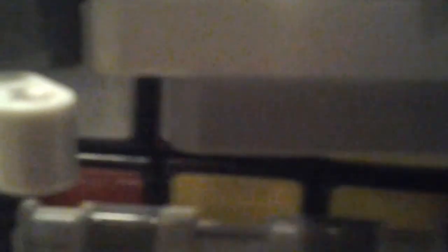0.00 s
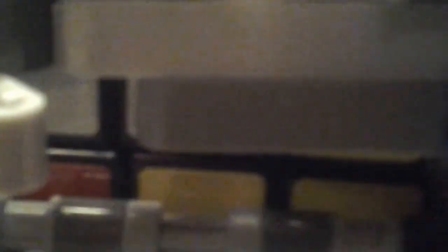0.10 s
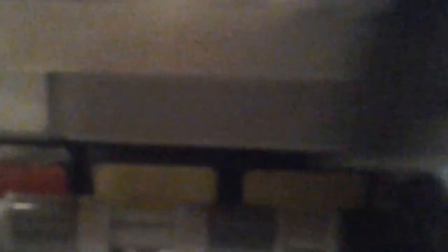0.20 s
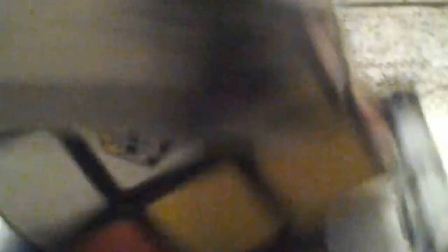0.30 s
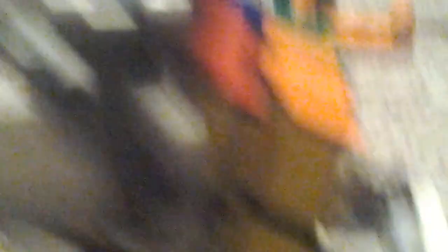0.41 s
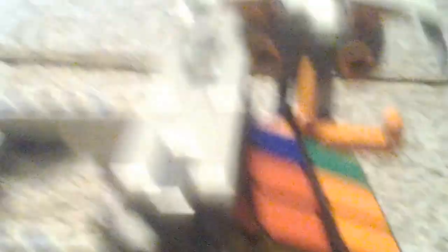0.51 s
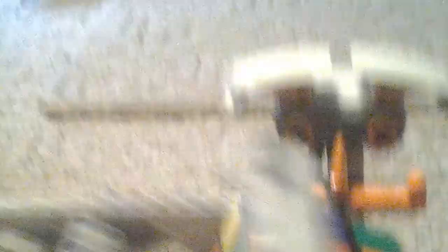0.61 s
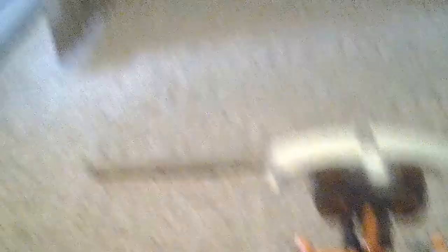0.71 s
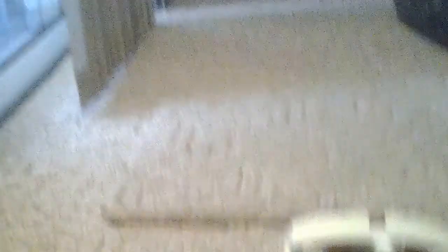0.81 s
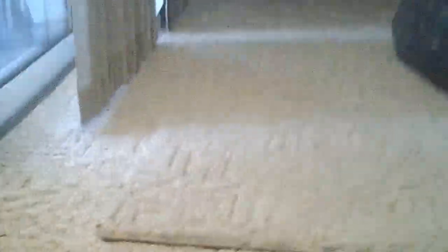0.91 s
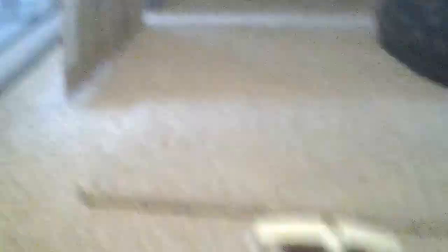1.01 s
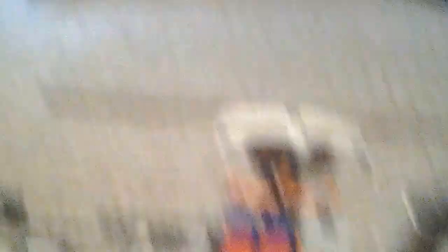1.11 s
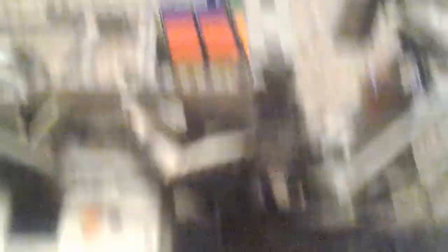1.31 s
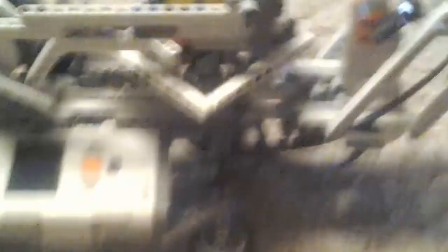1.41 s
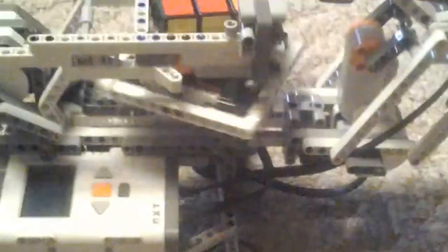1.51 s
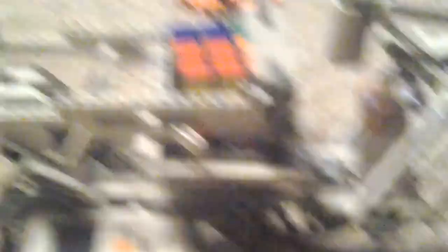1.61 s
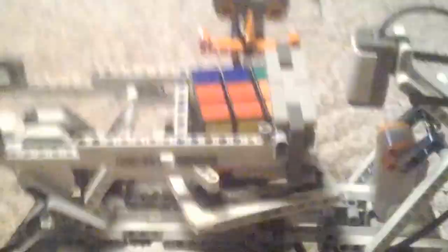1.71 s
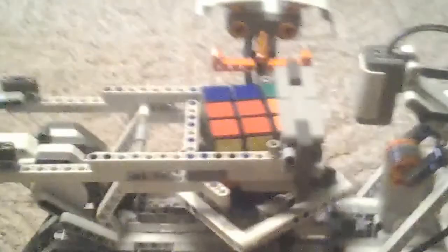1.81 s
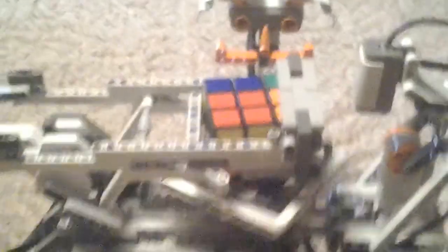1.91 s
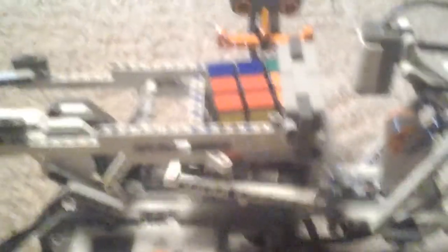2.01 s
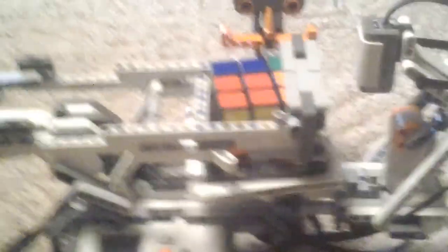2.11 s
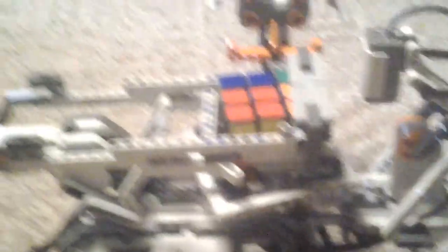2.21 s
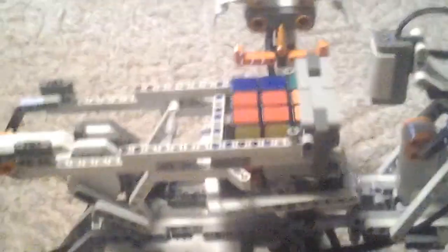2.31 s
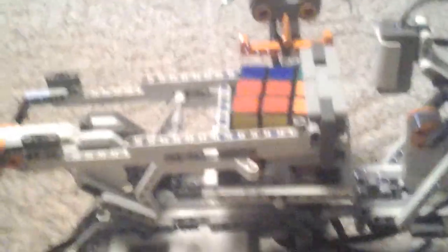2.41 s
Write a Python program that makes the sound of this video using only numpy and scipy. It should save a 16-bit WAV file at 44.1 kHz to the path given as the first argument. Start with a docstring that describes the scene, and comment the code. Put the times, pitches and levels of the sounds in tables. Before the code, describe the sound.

Geared toy motor whirring: quick rising zip, hard plastic clatter, labouring grind, then a longer rattling run

```python
"""On a carpeted floor, a toy robot turns a puzzle cube close to a small microphone.
Geared motors make a quick rising whirr, a labouring run under load and a long rattling run that coasts out.
Gear teeth are stacks of harmonics for the whine, and uneven pulses plus scraping noise for the rattle.
Plastic clicks, soft frame bumps and gear knocks are short bursts of noise that ring.
A thin motor whistle and short room echoes join in, and the loudest peaks overload."""
import sys
import numpy as np
from scipy import signal
from scipy.fft import rfft, irfft
from scipy.io import wavfile
from scipy.ndimage import uniform_filter1d

SR = 44100
rng = np.random.default_rng(int(sys.argv[2]) if len(sys.argv) > 2 else 0)


def pcm_store(signal):
    """Save signal as 16-bit PCM."""
    levels = np.round(np.clip(np.atleast_2d(signal), -1, 1) * 32767)
    wavfile.write(sys.argv[1], SR, levels.astype(np.int16).T)


N = 108045  # length in samples
T = np.arange(N) / SR  # time in seconds


def undb(db):
    """Turn decibels into gain."""
    return 10 ** (np.asarray(db) / 20)


def unit(x):
    """Scale to an average (rms) level of 1."""
    return x / np.sqrt(np.mean(x ** 2))


def peak(x, db):
    """Scale so that the highest peak has this level."""
    return x / np.abs(x).max() * undb(db)


def curve(table, axis=1):
    """Join one column of a table by straight lines in time."""
    rows = np.array(table)
    return np.interp(T, rows[:, 0], rows[:, axis])


def envelope(table, axis=1):
    """Turn a level_db column into gain, fading quickly outside the table's times."""
    before = np.maximum(table[0][0] - T, 0)
    after = np.maximum(T - table[-1][0], 0)
    return undb(curve(table, axis=axis)) * np.exp(-(before + after) / 0.0048)


def walk(rate_hz):
    """Random motion with spread 1; a higher rate moves faster."""
    freqs = np.arange(N // 2 + 1) * SR / N
    smoothing = (freqs > 0) / (1 + (freqs / rate_hz) ** 4)
    return unit(irfft(rfft(rng.standard_normal(N)) * smoothing, N))


def colour(x, points):
    """Filter through (pitch_hz, level_db) points, as a body rings after a blow and never before it."""
    hz, db = np.array(points).T
    octaves = np.log2(np.maximum(np.arange(N + 1) * SR / (2 * N), 1))
    below = np.maximum(np.log2(hz[0]) - octaves, 0)
    above = np.maximum(octaves - np.log2(hz[-1]), 0)
    # past the end points the level falls 29 dB per octave, for two octaves at most
    level_db = np.interp(octaves, np.log2(hz), db) - 29 * np.minimum(below + above, 2)
    # folding the cepstrum (spectrum of the log spectrum) makes the filter minimum-phase
    cepstrum = irfft(np.log(undb(level_db)))
    cepstrum[1:N] *= 2
    cepstrum[N + 1:] = 0
    return irfft(rfft(x, 2 * N) * np.exp(rfft(cepstrum)))[:N]


def ring(x, hz, width_hz):
    """Ring at one pitch; a narrower resonance rings longer."""
    b, a = signal.iirpeak(hz, hz / width_hz, fs=SR)
    return signal.lfilter(b, a, x)


def contact(start_s, decay_s):
    """A blow that starts suddenly, as noise that dies away quickly."""
    age = np.maximum(T - start_s, 0)
    return rng.standard_normal(N) * (T >= start_s) * np.exp(-age / decay_s)


def catching(rate_hz, depth_db):
    """Gears catch and slip unevenly: the level jumps up, then fades (a negative depth swells, then drops)."""
    phase = np.cumsum(rate_hz * np.exp(.4 * walk(59.8))) / SR
    return uniform_filter1d(undb(-depth_db * (phase % 1)), size=12)


def whine(hz, teeth_db, jitter, flutter_db, grit):
    """Meshing teeth make a stack of harmonics: the speed jitters, each harmonic flutters and frays."""
    phase = 2 * np.pi * np.cumsum(hz * (1 + jitter * walk(67.5))) / SR
    tone = 0
    for order, db in enumerate(teeth_db, start=1):
        gain = undb(db + flutter_db * walk(74))
        fray = grit * walk(264)
        tone = tone + gain * np.cos(order * phase + fray + 2 * np.pi * rng.random())
    return unit(tone)


def rattle(hz, body, scatter_db, scrape, surge_db, catch_hz, catch_db):
    """Teeth knock unevenly and scrape as they slide; both ring the plastic body."""
    phase = np.cumsum(hz * (1 + .1 * walk(300))) / SR
    strength = undb(scatter_db * np.clip(rng.standard_normal(N), -2, 2))
    teeth = np.diff(np.floor(phase), prepend=0) * strength * rng.choice([-1, 1], N)
    sliding = rng.standard_normal(N) * np.exp(-2 * (phase % 1))
    rough = unit(teeth) + scrape * unit(sliding)
    sound = colour(rough * undb(surge_db * walk(33)) * catching(catch_hz, catch_db), body)
    # even out the slow changes in level, so that each run's own curve sets them
    return sound / np.sqrt(uniform_filter1d(sound ** 2, size=1800))


# Loose parts shifting, mostly between the runs: start_s, level_db
SHIFTING_LEVEL = [(0,-38.5),(.11,-47.5),(.18,-40.5),(.3,-80),(.39,-41),(.413,-25.5),(.435,-33),(.46,-38.5),(.5,-33),(.535,-47),(.56,-43.5),(.9,-37),(.93,-40),(.98,-30),(1.015,-40),(1.06,-41.5),(1.13,-38),(1.2,-38.5),(2.15,-67),(2.22,-37.5),(2.45,-45.5)]
# How the loose parts ring: pitch_hz, level_db
LOOSE_PARTS_BODY = [(35, -70), (60, -34), (367, -10), (769, -15.5), (957, -13.5), (1450, -10.5),
                    (2010, -10), (2240, -11.5), (2780, -8), (3860, -5.5), (4210, -2.5), (5360, -7),
                    (5840, -11), (7430, -18.5), (11000, -28.5), (14300, -48), (22000, -120)]


def shifting():
    """Slack parts tick and rub: an uneven rattle with a lot of scraping."""
    ticks = rattle(260, LOOSE_PARTS_BODY, scatter_db=4, scrape=2.5, surge_db=1.8, catch_hz=70, catch_db=5)
    return ticks * envelope(SHIFTING_LEVEL)


# Whistle of the motor drive, before its flutter: start_s, level_db
DRIVE_LEVEL = [(0,-59),(.06,-55),(.17,-68),(1.1,-72),(1.27,-42),(1.45,-43),(1.7,-51),(2.15,-53),(2.22,-68)]
DRIVE_HZ = 7864


def drive():
    """The pulsed motor current whistles at one thin, fluttering pitch, strongest early in the long run."""
    return envelope(DRIVE_LEVEL) * undb(2 * walk(30)) * np.sin(2 * np.pi * DRIVE_HZ * T)


# Plastic clicks: start_s, peak_db, pitch_hz, decay_s
CLICK_EVENTS = [(.001,-27,2700,0.0085),(0.0091,-18,3660,0.0037),(0.051,-24,4700,0.0037),(0.0802,-26,4920,0.0067),(0.0902,-28,4540,0.002),(0.1226,-16,5020,0.0029),(0.139,-28,3200,0.0027),(0.1588,-20.5,3800,0.0018),(.174,-38,4770,0.0035),(0.184,-21,4500,0.0023),(0.195,-16,4050,0.0044),
                (.3515,-1.5,4260,0.00088),(0.359,-4,4010,0.011),(.3968,2.5,3150,0.0037),(0.402,-1.5,4640,0.0066),(0.4415,-13,4190,0.01),(0.47,-20.5,2760,0.0068),(0.486,-12.5,2760,0.0062),(0.5113,-13,2870,0.0024),(0.5559,-13.5,4130,0.0036),(0.565,-15.5,4200,0.0077),
                (0.5913,-5,4570,0.003),(0.6066,-8.5,4040,0.0018),(0.616,-4.5,4630,0.0012),(.648,-6,4430,0.0092),(0.631,-3,6300,0.0033),(0.6713,0.5,4100,0.0018),(0.672,-6.5,6500,0.0037),(0.6792,-3,4330,0.0028),(0.696,-4,4700,0.00078),(0.7066,-3,4280,0.0043),(0.7156,-3.5,4140,0.0084),(0.7287,-6,4160,0.0024),(0.7534,-9.5,3000,0.0028),(0.7705,-5.5,4300,0.0047),(0.789,-15,4050,0.0031),(0.8,-13,2670,0.0039),(0.845,-10,4730,0.0034),(0.901,-16,3740,0.0046),
                (0.9364,-28,4380,0.0092),(1.031,-15.5,4680,0.0054),(1.0866,-23,5000,0.0038),(1.373,-8,1500,0.0012),(2.422,-26,4450,.002),(2.4343,-11.5,4460,0.0017),(2.4405,-17.5,4600,.007)]
# How the plastic parts ring: pitch_hz, level_db
PLASTIC_BODY = [(59, -85), (100, -67), (375, -38), (849, -17), (942, -5), (1430, -14), (2090, -3),
                (2270, -5.5), (2800, 7), (3610, -0.5), (4350, 6), (6090, -6), (11000, -20), (15000, -51)]
RING_WIDTH_HZ, RING_DB = 340, 3.5  # each click's own ring; its level is relative to the plastic body


def clicks():
    """Plastic beams and cube faces knock together: a shared body sound plus each click's own short ring."""
    body = colour(signal.unit_impulse(N), PLASTIC_BODY)[:512]
    out = np.zeros(N)
    for start_s, peak_db, pitch_hz, decay_s in CLICK_EVENTS:
        blow = contact(start_s, decay_s)
        plastic = unit(np.convolve(blow, body)[:N])
        own_ring = unit(ring(blow, pitch_hz, RING_WIDTH_HZ))
        out = out + peak(plastic + undb(RING_DB) * own_ring, peak_db)
    return out


# Speed of the quick run, as teeth passing per second: start_s, pitch_hz
QUICK_SPEED = [(.2,450),(.217,499),(.233,557),(.243,595.6),(.26,648.4),(.276,681),(.3,691),(.32,712),(.336,754)]
# Loudness of the quick run: start_s, whine_db, rattle_db
QUICK_LEVELS = [(.19,-56,-28),(.203,-23.5,-15.5),(.231,-14,-11.5),(.258,-10,-15.5),(.287,-11.5,-17),(.329,-11,-16),(.339,-31,-19.5),(.372,-56,-38),(.392,-70,-38)]
# Harmonics of the tooth rate, lowest first: level_db
QUICK_TEETH_DB = [-50,-11,-5,-11.5,-0.5,-6,2.5,-15,-12,-23,-10,-25,-24]
# The casing favours harmonics that sweep through its ring: pitch_hz, level_db
QUICK_CASING = [(1300,-5.5),(2900,-5.5),(3500,4.5),(4550,4),(5100,-9.5),(7500,-3),(11000,-2)]
# How the rattle rings the body: pitch_hz, level_db
QUICK_BODY = [(240, -104), (400, -71), (612, -93), (816, -22), (949, -39), (1350, -16.5), (1690, -24),
              (2000, -13.5), (2510, -10.5), (3340, -10), (4390, 0), (5680, -8.5), (11200, -19),
              (15000, -57)]


def quick_run():
    """A free motor speeds up, so its gritty whine rises and its teeth rattle faster."""
    hz = curve(QUICK_SPEED)
    tone = whine(hz, QUICK_TEETH_DB, jitter=.003, flutter_db=2.2, grit=.25)
    tone = unit(colour(tone, QUICK_CASING))
    gears = rattle(hz, QUICK_BODY, scatter_db=1.5, scrape=1.36, surge_db=0.8, catch_hz=200, catch_db=-1.0)
    return tone * envelope(QUICK_LEVELS) + gears * envelope(QUICK_LEVELS, axis=2)


# Dull bumps of the frame: start_s, peak_db, pitch_hz, decay_s
BUMP_EVENTS = [(0.398,-49,328,0.013),(0.707,-18,1080,0.0037),(0.832,-25.5,276,0.0036),(.848,-36,293.2,0.0053),(0.935,-37.5,270,0.011),(.985,-28,470,0.038),(1.023,-34.5,370,0.0048),(1.488,-19,497,0.0018),(1.49,-34.5,300,0.0064),(1.726,-31,272,0.0036)]


def bumps(width=0.97):
    """The frame knocks softly and low: each blow passes twice through a broad ring."""
    out = np.zeros(N)
    for start_s, peak_db, pitch_hz, decay_s in BUMP_EVENTS:
        once = ring(contact(start_s, decay_s), pitch_hz, width * pitch_hz)
        out = out + peak(ring(once, pitch_hz, width * pitch_hz), peak_db)
    return out


# Speed of the loaded run, as teeth passing per second: start_s, pitch_hz
LOADED_SPEED = [(.56,497.3),(.595,546.7),(.607,584),(.625,631.4),(.65,655.7),(.70,619),(.73,634.4),(.78,615.6),(.83,632.2),(.88,637.3)]
# Loudness of the whine: start_s, level_db
LOADED_WHINE = [(.57,-49),(.598,-22),(.607,-13),(.619,-10.5),(.622,2.5),(.627,-4),(.632,-7),(.652,-22),(.665,-34),(.705,-39),(.727,-2),(.738,-25.5),(.781,-16.5),(.795,-52),(.819,-28),(.825,-16),(.837,-13.5),(.842,-37),(.877,-21.5),(.9,-34)]
# Loudness of the grinding: start_s, level_db
LOADED_RATTLE = [(.553,-43),(.588,-18.5),(.6,-13.5),(.63,-16.5),(.652,-16),(.664,-23),(.678,-14.5),(.698,-25.5),(.711,-16),(.742,-27.5),(.762,-28),(.773,-17.5),(.795,-27),(.818,-30),(.858,-18),(.88,-19),(.892,-35),(.915,-36)]
# Harmonics of the tooth rate, lowest first: level_db
LOADED_TEETH_DB = [-58,-25.5,-33,-10,-17,-2,9,-8,-37,-21,-17]
# How the grinding rings the body: pitch_hz, level_db
LOADED_BODY = [(180, -56), (300, -49), (326, -54), (377, -70), (669, -44), (1040, -28.5), (1400, -31.5),
               (2730, -10.5), (3490, -13.5), (4470, -2.5), (5620, -21), (6510, -18), (7420, -24),
               (11400, -24.5), (12700, -78)]


def loaded_run():
    """The motor labours against the cube; its gears squeal in fits and grind in separate grains."""
    hz = curve(LOADED_SPEED)
    tone = whine(hz, LOADED_TEETH_DB, jitter=.007, flutter_db=4, grit=.25)
    tone = tone * unit(catching(230, depth_db=8))
    grind = rattle(hz, LOADED_BODY, scatter_db=2.5, scrape=.8, surge_db=1, catch_hz=190, catch_db=9)
    return tone * envelope(LOADED_WHINE) + grind * envelope(LOADED_RATTLE)


# Speed (teeth per second, before the wobble) and whine of the long run: start_s, pitch_hz, level_db
LONG_SPEED = [(1.17,718.8,-44),(1.225,756.4,-35),(1.27,786.8,-26),(1.33,783.1,-25),(1.4,789.4,-25),(1.46,783.6,-25),(1.53,783,-31),(1.58,797.7,-27),(1.65,824,-25),(1.75,833.2,-28),(1.81,815.6,-24),(1.85,788,-24),(1.89,772.2,-26.5),(1.94,762.7,-21.5),(1.98,785.6,-31),(2.05,822,-29.5),(2.12,854.2,-27),(2.17,867.2,-30),(2.2,835.5,-44)]
# Loudness before the trims below: start_s, housing_db, gearbox_db
LONG_LEVELS = [(1.135,-51,-34),(1.16,-39.5,-24.5),(1.198,-40.5,-27),(1.22,-34.5,-21),(1.27,-27,-15.5),(1.36,-22.5,-15),(1.48,-24.5,-19.5),(1.545,-27.5,-20.5),(1.6,-21.5,-19.5),(1.655,-26.5,-21),(1.69,-24,-17.5),(1.76,-26,-22),(1.826,-26,-18.5),(1.845,-27,-25),(1.877,-26,-15.5),(1.9,-30,-20.5),(1.95,-27.5,-22),(2.06,-23.5,-20),(2.125,-24.5,-18.5),(2.17,-24,-23.5),(2.21,-46,-36.5),(2.238,-35,-37),(2.295,-30,-31),(2.37,-34.5,-35),(2.395,-44,-49),(2.43,-40,-32.5),(2.45,-54,-43)]
# Harmonics of the tooth rate, lowest first: level_db
LONG_TEETH_DB = [-18,-1.5,0,-7,7,-5,-29,-17.5,-9,-16]
# Harmonics of a slower gear stage, lowest first: level_db
IDLER_TEETH_DB = [-26,-24,-26,0]
# How the housing rings: pitch_hz, level_db
HOUSING_BODY = [(250, -67), (480, -25.5), (680, -34), (819, -13.5), (1040, -27.5), (1310, -20),
                (1550, -13.5), (1770, -19), (2000, -1.5), (2240, 1), (2400, -1), (2710, -19), (2900, -46),
                (3770, -66), (6380, -120)]
# How the gearbox rings: pitch_hz, level_db
GEARBOX_BODY = [(1650, -52), (2800, -14), (3170, -10.5), (3540, -7.5), (3870, -0.5), (4370, -2.5),
                (4600, 6), (4750, -2), (5050, -6), (5520, -3), (5810, -17), (6570, -4.5), (7460, -17.5),
                (8160, -14), (8870, -21), (9640, -18.5), (10600, -29), (13800, -89), (22000, -120)]
# Loudness of the squealing harmonic, before its random swelling: start_s, level_db
SQUEAL_LEVEL = [(1.2,-47),(1.275,-22),(1.33,-28),(1.55,-34),(1.74,-34),(1.78,-28),(1.85,-32),(1.88,-20),(1.9,-29),(2.08,-35),(2.16,-28),(2.185,-48)]
WOBBLE_HZ, WOBBLE = 14.34, .014  # the speed sways by this fraction
IDLER_RATIO = 2 / 3  # speed of the slower stage relative to the tooth rate
HOUSING_DB, IDLER_DB, GEARBOX_DB = -1, -7, -3  # trims
SQUEAL_ORDER, SQUEAL_WIDTH_HZ = 6, 100  # which harmonic squeals, and how much it blurs


def long_run():
    """A run at a swaying speed: loose gears whine, squeal, rattle in the gearbox and drum on the housing."""
    hz = curve(LONG_SPEED) * (1 + WOBBLE * np.sin(2 * np.pi * WOBBLE_HZ * T))
    housing = rattle(hz, HOUSING_BODY, scatter_db=2, scrape=0.38, surge_db=2.0, catch_hz=83.8, catch_db=11.0)
    idler = whine(hz * IDLER_RATIO, IDLER_TEETH_DB, jitter=.012, flutter_db=4, grit=.3)
    drumming = (housing * undb(HOUSING_DB) + idler * undb(IDLER_DB)) * envelope(LONG_LEVELS)
    gears = rattle(hz, GEARBOX_BODY, scatter_db=2, scrape=.75, surge_db=1.9, catch_hz=130, catch_db=6)
    gears = gears * envelope(LONG_LEVELS, axis=2) * undb(GEARBOX_DB)
    tone = whine(hz, LONG_TEETH_DB, jitter=.006, flutter_db=3.5, grit=.3) * envelope(LONG_SPEED, axis=2)
    # two random strengths, a quarter cycle apart, blur one harmonic into a squeal
    mesh = 2 * np.pi * SQUEAL_ORDER * np.cumsum(hz) / SR
    squeal = walk(SQUEAL_WIDTH_HZ) * np.cos(mesh) + walk(SQUEAL_WIDTH_HZ) * np.sin(mesh)
    return drumming + gears + tone + squeal * envelope(SQUEAL_LEVEL)


# Knocks on the housing during the long run: start_s, peak_db
KNOCK_EVENTS = [(1.339,-22),(1.424,-23),(1.555,-13),(1.601,-14.5),(1.688,-11.5),(1.699,-14.5),(1.872,-9),(1.895,-11),(1.926,-12),(1.949,-13),(2.035,-12),(2.147,-17)]
KNOCK_HZ, KNOCK_WIDTH_HZ, KNOCK_DECAY_S = 2170, 270, 0.0035


def knocks():
    """The gears take up their slack and ring the housing: a blow through a narrow, then a wider ring."""
    out = np.zeros(N)
    for start_s, peak_db in KNOCK_EVENTS:
        narrow = ring(contact(start_s, KNOCK_DECAY_S), KNOCK_HZ, KNOCK_WIDTH_HZ)
        out = out + peak(ring(narrow, KNOCK_HZ, 2 * KNOCK_WIDTH_HZ), peak_db)
    return out


SNAP_S, SNAP_DB, SNAP_DECAY_S = 1.4146, -4, 0.00039  # start, peak level, decay


def snap():
    """One tiny bright snap: a very short blow through a broad, high ring."""
    return peak(ring(contact(SNAP_S, SNAP_DECAY_S), 5800, 3300), SNAP_DB)


ROOM_DECAY_S, ROOM_DB = 0.017, -14


def room(robot):
    """Short echoes: the sound returns as a fading, coloured scatter of copies."""
    echoes = colour(contact(0.004, ROOM_DECAY_S), [(200, -6), (5000, -9), (10000, -2), (13000, -49)])
    return signal.fftconvolve(robot, echoes / np.linalg.norm(echoes))[:N] * undb(ROOM_DB)


def scene():
    """The robot and its room echoes, the same in both channels."""
    robot = shifting() + drive() + clicks() + quick_run() + bumps()
    robot = robot + loaded_run() + long_run() + knocks() + snap()
    return np.tile(robot + room(robot), (2, 1))


TOP_HZ = 15574


def record(dry):
    """The microphone clips at full scale, dulls the treble, thins the bass and cuts the very top."""
    clipped = np.clip(dry, -1, 1)
    dull = signal.sosfilt(signal.butter(6, 12500, fs=SR, output="sos"), clipped)
    thin = signal.sosfilt(signal.butter(2, 70, "high", fs=SR, output="sos"), dull)
    return signal.sosfilt(signal.ellip(8, .2, 70, TOP_HZ, fs=SR, output="sos"), thin)


dry = scene()
out = record(dry)
pcm_store(out)
```